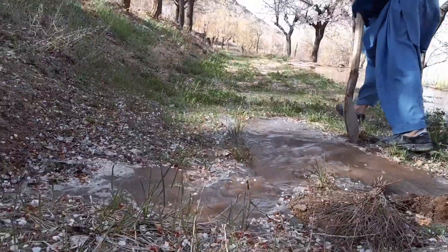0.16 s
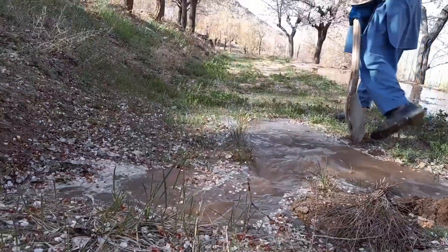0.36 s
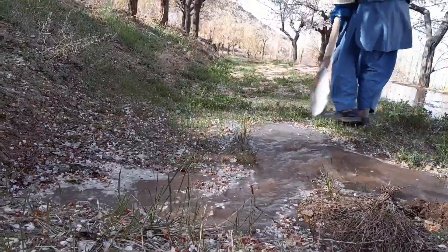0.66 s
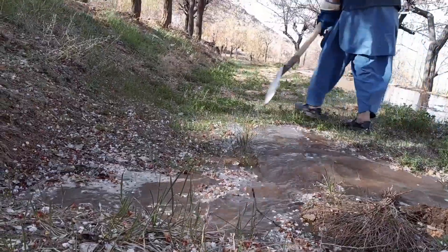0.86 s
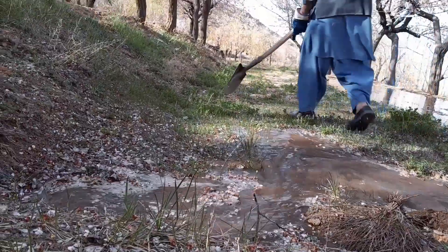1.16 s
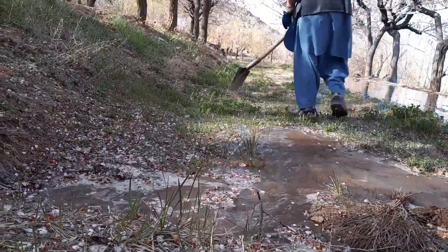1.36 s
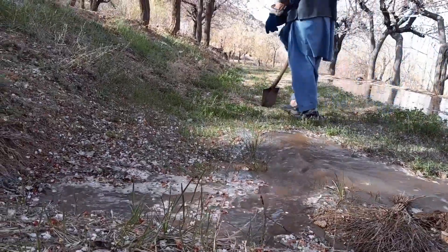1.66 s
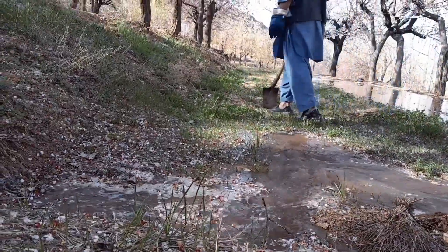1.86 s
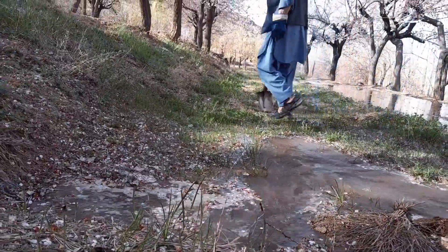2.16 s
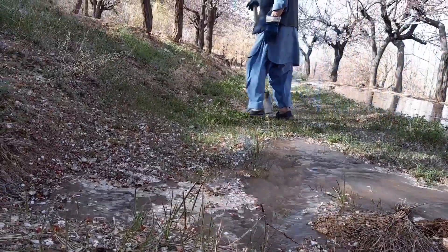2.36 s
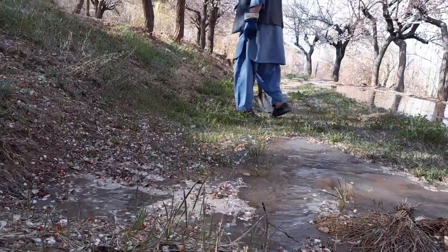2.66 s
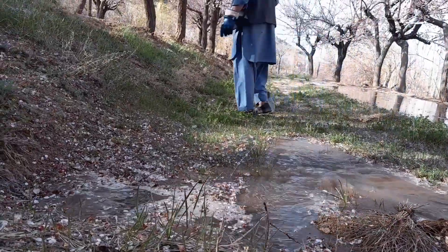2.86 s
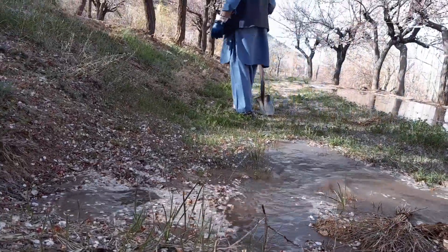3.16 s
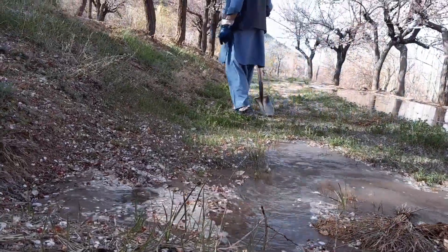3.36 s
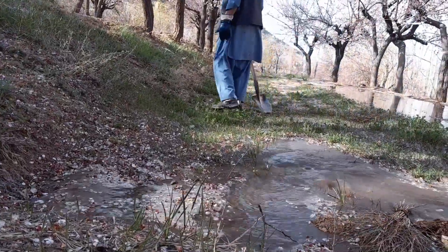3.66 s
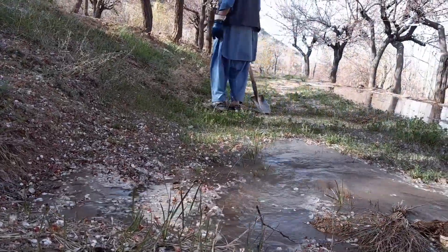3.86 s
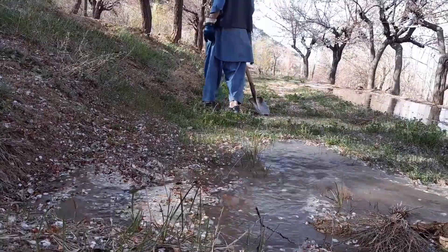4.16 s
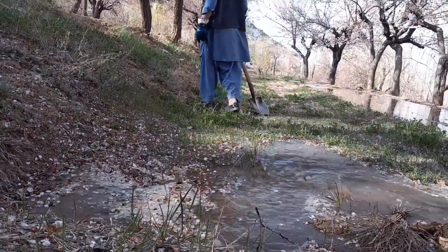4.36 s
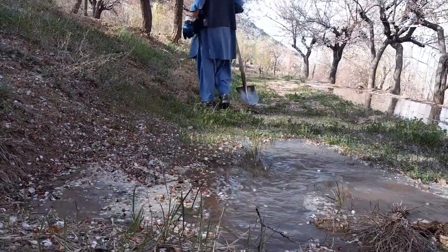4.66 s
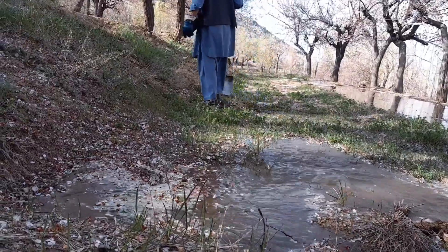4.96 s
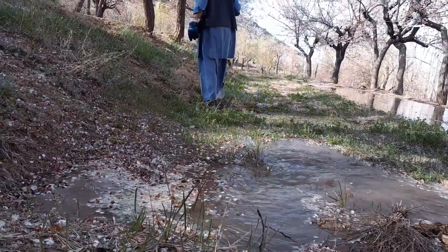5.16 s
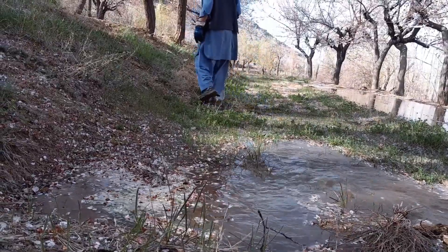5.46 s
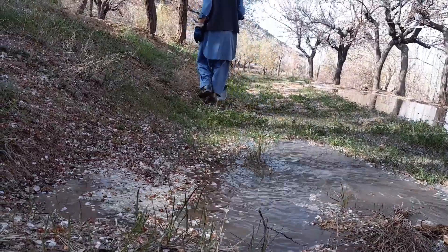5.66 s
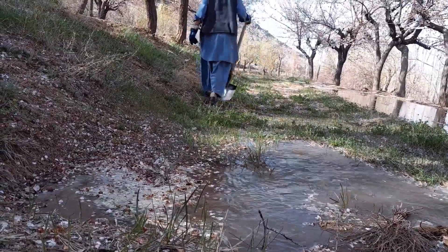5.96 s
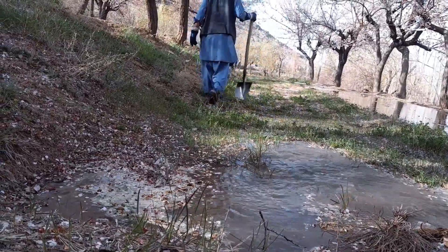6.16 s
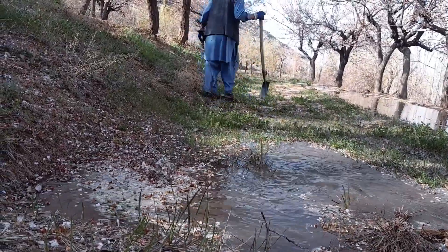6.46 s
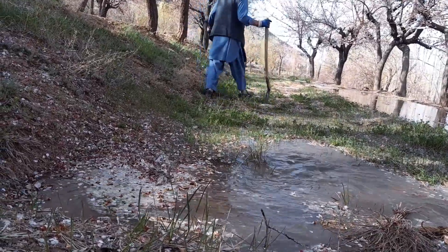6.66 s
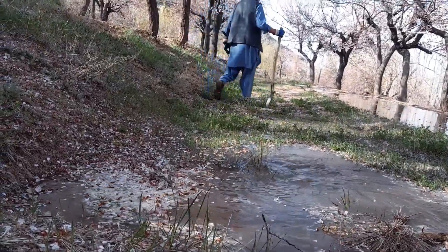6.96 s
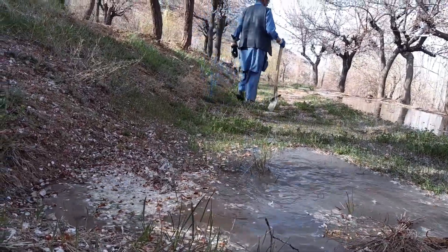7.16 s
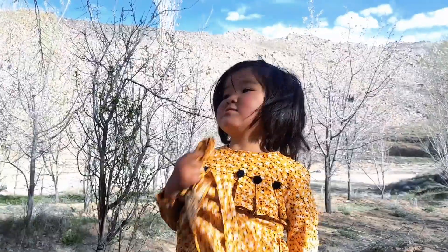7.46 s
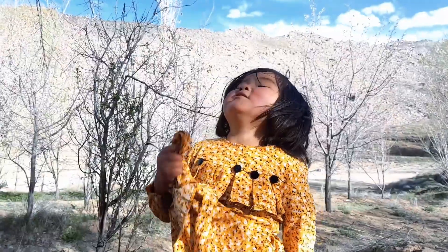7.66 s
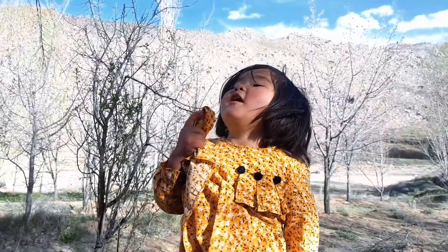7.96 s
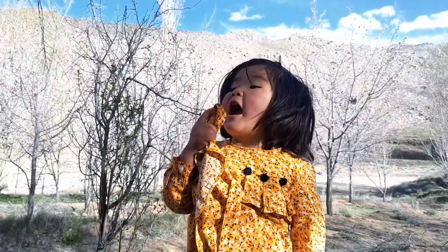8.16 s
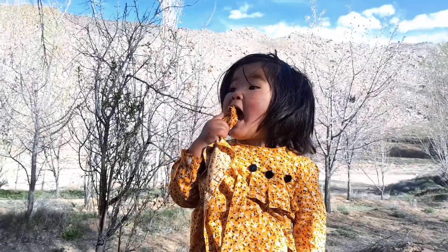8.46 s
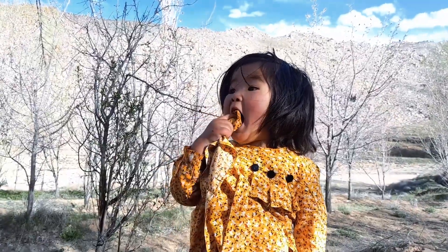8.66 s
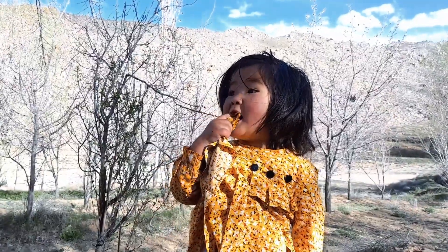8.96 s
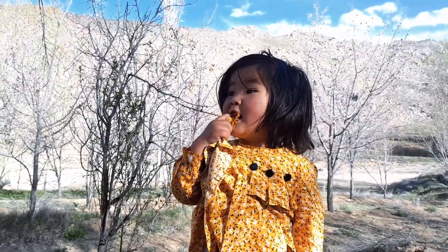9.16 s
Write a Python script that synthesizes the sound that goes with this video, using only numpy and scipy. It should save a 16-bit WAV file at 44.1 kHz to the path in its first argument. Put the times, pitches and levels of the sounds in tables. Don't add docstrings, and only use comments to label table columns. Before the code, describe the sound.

A steady rush of ditch water, full of glugs, fizz and splashing drops, suddenly gives way to faint, softly buffeting wind.

```python
import sys
import numpy as np
from scipy import signal
from scipy.fft import rfft, irfft, next_fast_len
from scipy.io import wavfile
from scipy.ndimage import uniform_filter1d

SR = 44100
rng = np.random.default_rng(int(sys.argv[2]) if len(sys.argv) > 2 else 0)


def volts_from_db(level):
    exponent = np.asarray(level, float) / 20
    return 10 ** exponent


def wav_record(signal):
    frames = np.transpose(np.atleast_2d(signal))
    bounded = np.clip(frames, -1, 1)
    quanta = np.round(bounded * 32767).astype(np.int16)
    wavfile.write(sys.argv[1], SR, quanta)


N = 410571
CUT_S = 7.1667


def water():
    # start_s, level_db
    flow_strength = [(0, 0), (.45, 1.5), (.9, 2), (1.35, 1.7), (1.9, 1.55), (2.4, 1.1), (2.9, 1.2),
                     (3.3, 0.6), (3.75, 3), (4.2, 2), (4.6, 2.5), (5.1, 1.5), (5.5, 1.5), (5.9, 2),
                     (6.3, 2.1), (6.55, 3.8), (6.85, 3.4), (7.16, 1)]
    # pitch_hz, level_db per dB of flow
    flow_share = [(110, 1), (500, -0.15), (3500, 0.76), (11000, 0.87)]
    # start_s, length_s, level_db
    glugs = [(0.66, 0.084, -31), (1.027, 0.04, -35), (1.19, 0.14, -18), (1.396, 0.036, -23),
             (1.52, 0.062, -22), (1.917, 0.07, -29), (2.19, 0.042, -26), (2.29, 0.038, -25),
             (2.751, 0.048, -28), (3.601, 0.052, -23), (3.798, 0.042, -32), (4.484, 0.042, -27),
             (4.638, 0.058, -25), (5.371, 0.086, -20), (5.696, 0.048, -16), (5.83, 0.091, -22),
             (6.2, 0.096, -37), (6.364, 0.04, -30), (6.49, 0.039, -37), (6.574, 0.038, -22),
             (6.628, 0.046, -30)]
    glug_kind = 118, 0.17, -34, .6
    # start_s, length_s, level_db
    gurgles = [(0.145, 0.046, -35), (0.221, 0.032, -35), (0.3, 0.084, -33), (0.797, 0.046, -26),
               (1.036, 0.03, -31), (1.177, 0.058, -27), (1.54, 0.034, -33), (1.909, 0.049, -28),
               (2.18, 0.048, -26), (2.285, 0.061, -23.5), (2.454, 0.032, -29), (2.825, 0.097, -32),
               (3.21, 0.03, -30), (3.335, 0.095, -30), (3.627, 0.033, -28), (3.69, 0.078, -34),
               (3.8, 0.037, -27), (4.166, 0.082, -31.5), (4.25, 0.026, -31), (4.407, 0.12, -32.5),
               (4.592, 0.066, -33), (5.097, 0.054, -28.5), (5.313, 0.042, -35), (5.4, 0.1, -29),
               (5.873, 0.054, -32), (5.956, 0.035, -34), (6.3, 0.025, -34), (6.564, 0.032, -28),
               (7.005, 0.056, -31)]
    gurgle_kind = 383, 1.3, -37.5, 0.49
    # pitch_hz, level_db
    colour = [(30, -22), (60, -7.5), (130, 0), (230, -4.5), (450, -9), (720, -17.5), (1500, -21.5),
              (2000, -22.5), (3100, -19.5), (5900, -20), (7700, -19.5), (8800, -31), (10500, -30.5),
              (15000, -38.5)]
    # pitch_hz, width_hz, level_db
    peaks = [(390, 120, 3), (600, 160, 2.5), (930, 150, 4.2), (1200, 220, 3), (2430, 250, 1.5),
             (2750, 250, -2), (4330, 420, 4), (6650, 450, 4), (15500, 400, -10)]
    # pitch_hz, level_db
    lean = [(60, .5), (300, 2.5), (600, 2), (700, -1), (900, 2.5), (1500, 1.5), (2300, 3.5), (3000, 2.5),
            (3900, -1.5), (5300, 2), (6600, -.5), (7800, 1.5), (10500, -1.5)]
    # pitch_hz, likeness 0-1
    same = [(30, .65), (130, .97), (400, .99), (700, .92), (830, .96), (1250, .9), (1600, .7), (2000, .84),
            (2700, .66), (3200, .76), (3550, .62), (4300, .82), (5000, .6), (10000, .52), (11000, .38),
            (12800, .36), (14000, .12)]
    # pitch_hz, phase_rad the right port gains back
    turn = [(690, .05), (820, -.75), (950, -.05), (1120, -.4), (1300, .1), (1950, -.65), (2400, .55),
            (3150, .05), (3500, .75), (4100, -.5), (5000, -.9), (5800, .65), (7500, -1.25), (9200, 0),
            (12000, .1), (12800, -1.1)]

    gurgle = bubbles(68.3, 1213, per_s=500, cycles=1.92, spread_db=2.5, rise=0.036, count=16)
    fizz = bubbles(1219, 15890, per_s=6000, cycles=6.7, spread_db=4., rise=0.024, count=24)
    wash = volts_from_db(3.0) * rng.standard_normal((2, N))
    grain = evened(flattened(0.41 * gurgle + fizz) + wash)
    collapses = [(glugs, glug_kind), (gurgles, gurgle_kind)]
    flow = surged(grain, flow_strength, flow_share, collapses, patch_db=1.45, flicker_db=.5, tilt=0.16)
    return ports(flow + slaps(), colour, peaks, lean, same, turn, level_db=-27)


def bubbles(lo_hz, hi_hz, per_s, cycles, spread_db, rise, count):
    born = rng.random((2, N)) < per_s / SR
    size = volts_from_db(spread_db * np.minimum(rng.exponential(1, (2, N)), 4)) * born
    kind = rng.integers(0, count, (2, N))
    out = np.zeros((2, N))
    for k, hz in enumerate(np.geomspace(lo_hz, hi_hz, count)):
        u = np.arange(int(5 * cycles * SR / hz)) * hz / (cycles * SR)
        envelope = (1 - np.exp(-6 * u)) * np.exp(-u)
        ring = envelope * np.sin(2 * np.pi * cycles * (u + rise * u ** 2))
        out += signal.oaconvolve(size * (kind == k), ring[None] * np.sqrt(hz), axes=1)[:, :N]
    return evened(out)


def slaps():
    # start_s, peak_db, spray_share_db
    drops = [(0.048, -18.5, -24), (0.6365, -39, -30), (1.0207, -18.5, -20), (1.062, -30, 0),
             (1.3523, -24, -18), (1.448, -20, -19), (1.7389, -37, -17), (2.0088, -28.5, -21),
             (2.193, -16.5, -15), (2.2218, -43, -26), (2.4687, -18, -19), (2.595, -17.5, -27),
             (2.7072, -23, -32), (2.742, -23, -19), (3.493, -19, -14), (3.638, -22, -17), (3.68, -20, -18),
             (3.703, -18.5, -29), (3.9654, -24, -15), (4.0811, -30, -13), (4.1833, -18.5, -49),
             (4.4014, -43, -27), (4.6478, -27, -42), (5.1118, -17.5, -42), (5.6845, -18, -21),
             (6.412, -22, -18), (6.565, -29, -9), (6.617, -17, -18), (6.9721, -40, -49),
             (7.1252, -18.5, -22)]
    # start_s, peak_db
    spits = [(0.0478, -40), (1.052, -38), (1.0919, -27), (1.2481, -25), (1.3488, -22), (1.5309, -20),
             (1.7394, -24), (1.7759, -34), (2.1929, -22), (3.5723, -24), (3.9799, -24), (4.1195, -23),
             (4.2418, -36), (5.7823, -30), (5.8356, -28), (6.7206, -25)]

    body, spray = np.zeros((2, N))
    for start_s, db, share_db in drops:
        body[round(start_s * SR)] += volts_from_db(db + 31)
        spray[round(start_s * SR)] += volts_from_db(db + share_db + 43)
    for start_s, db in spits:
        spray[round(start_s * SR)] += volts_from_db(db + 38.5)

    t = np.arange(1500) / SR
    decay = np.exp(-t / 0.003) + 0.13 * np.exp(-t / .012)
    puff = (1 - np.exp(-t / 0.00091)) * decay
    noise = rng.standard_normal((2, N))
    low = signal.sosfiltfilt(signal.butter(6, 8300, fs=SR, output="sos"), noise)
    mid = signal.sosfilt(signal.butter(2, 1200, "high", fs=SR, output="sos"), low)
    body_noise = mid * signal.oaconvolve(body, puff)[:N]
    spray_noise = (noise - low) * signal.oaconvolve(spray, puff)[:N]
    return body_noise + spray_noise


def field():
    # start_s, level_db
    breeze = [(7.17, -1.5), (7.45, -1.5), (7.7, -1), (7.9, 0.4), (8.15, -.5), (8.5, 0), (8.75, 0), (9.0, 1),
              (9.31, -1.5)]
    # pitch_hz, level_db per dB of breeze
    breeze_share = [(60, 0.3), (190, 1.3), (1500, 1.25), (7000, 1.04)]
    # start_s, length_s, level_db
    buffets = [
        (7.273, 0.036, -46),
        (7.47, 0.042, -42),
        (7.735, 0.051, -44),
        (7.82, 0.074, -39),
        (8.18, 0.081, -34),
        (8.39, 0.086, -37),
        (8.536, 0.047, -37),
        (8.63, 0.048, -44),
        (8.764, 0.265, -36.5),
        (9.144, 0.12, -33),
    ]
    buffet_kind = 66, 1.6, -42.5, 1.04
    # pitch_hz, level_db
    colour = [(25, -28), (50, -3.5), (130, -3.5), (350, -19), (550, -22), (900, -21.5), (1500, -18.5),
              (2200, -25.5), (4000, -27.5), (6800, -29), (8100, -27), (8900, -37.5), (15000, -33)]
    # pitch_hz, width_hz, level_db
    peaks = [(563, 110, 6), (1050, 81, 1.5), (2820, 430, 3.5), (11100, 500, -3), (14800, 1200, -6)]
    # pitch_hz, level_db
    lean = [(40, 7), (130, 2.5), (550, 4.5), (900, 12), (1500, 26), (2100, 20), (4000, 31), (5600, 41),
            (6800, 40), (8100, 38), (8900, 30), (15000, 25)]
    # pitch_hz, likeness 0-1
    same = [(30, 0.43), (90, 0.53), (220, 0.93), (600, 0.79), (800, 0.57), (2000, 0.62), (4500, 0.31),
            (5500, 0.14)]
    # pitch_hz, phase_rad the right port gains back
    turn = [(50, -0.1), (800, -0.6), (1200, -0.3), (1800, 1.8), (3000, 3.0), (4500, 4.6), (5500, 5.5)]

    air = surged(rng.standard_normal((2, N)), breeze, breeze_share, [(buffets, buffet_kind)],
                 patch_db=0.94, flicker_db=0.85, tilt=-0.046)
    return ports(air, colour, peaks, lean, same, turn, level_db=-35.5)


def surged(x, control, share, events, patch_db, flicker_db, tilt):
    hz, t, z = signal.stft(x, SR, nperseg=512, noverlap=384)
    level_db = read(share, hz)[:, None] * np.interp(t, *np.transpose(control))
    level_db += sum(swells(t, hz, *event) for event in events)
    patches = rng.standard_normal((len(t), len(hz))).T
    patches = uniform_filter1d(patches, size=14, axis=0)
    patches = evened(uniform_filter1d(patches, size=10, axis=1))
    flicker = evened(uniform_filter1d(rng.standard_normal(len(t)), size=5))
    pitch_weight = ((hz[:, None] + 40) / 5000) ** tilt
    level_db += (patch_db * patches + flicker_db * flicker) * pitch_weight
    return signal.istft(z * volts_from_db(level_db), SR, nperseg=512, noverlap=384)[1][:, :N]


def swells(t, hz, rows, kind):
    pitch_hz, octaves, calm_db, share = kind
    edge_s = 0.005
    start_s, length_s, db = np.transpose(rows)[:, :, None]
    rising = np.tanh((t - start_s) / edge_s)
    falling = np.tanh((t - start_s - length_s) / edge_s)
    held = (rising - falling) / 2
    near = np.exp(-(np.log2((hz + 20) / pitch_hz) / octaves) ** 2)
    return near[:, None] * (share * (db - calm_db) * held).sum(axis=0)


def ports(x, colour, peaks, lean, same, turn, level_db):
    lag = 20
    direct, scattered = rfft(x, next_fast_len(N))
    hz = np.linspace(0, SR / 2, len(direct))
    like = np.clip(read(same, hz), 0, 1)
    later = np.exp(1j * (read(turn, hz) - 2 * np.pi * hz * lag / SR))
    right = like * direct * later + np.sqrt(1 - like ** 2) * scattered
    right = right * volts_from_db(-read(lean, hz))
    resonance_db = sum(db / (1 + (2 * (hz - f) / width) ** 2) for f, width, db in peaks)
    colour_db = read(colour, hz) + resonance_db
    pair = irfft(np.array([direct, right]) * volts_from_db(colour_db))[:, :N]
    return volts_from_db(level_db) * pair / np.sqrt(np.mean(pair[0] ** 2))


def flattened(x):
    z = rfft(x, next_fast_len(N))
    power = uniform_filter1d(abs(z) ** 2, size=1500, axis=-1)
    return evened(irfft(z / np.sqrt(power + 1e-12))[..., :N])


def evened(x):
    return x / np.sqrt(np.mean(x ** 2) + 1e-20)


def read(points, hz):
    f, value = np.transpose(points)
    return np.interp(np.log(hz + 1), np.log(f + 1), value)


def scene():
    return np.where(np.arange(N) < CUT_S * SR, water(), field())


def low_pass(x):
    return signal.sosfilt(signal.butter(12, 15580, fs=SR, output="sos"), x)


def record(dry):
    return low_pass(dry)


dry = scene()
out = record(dry)
wav_record(out)
```